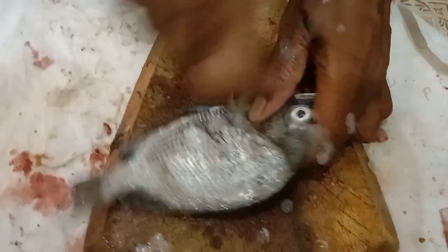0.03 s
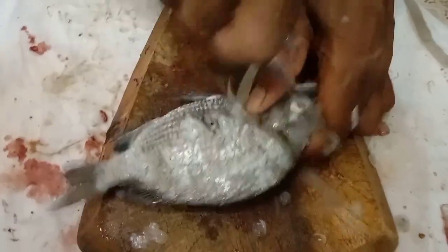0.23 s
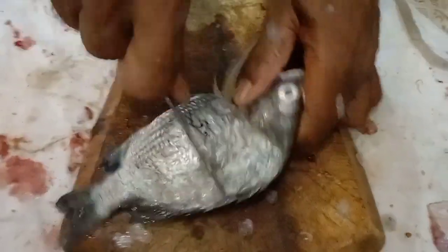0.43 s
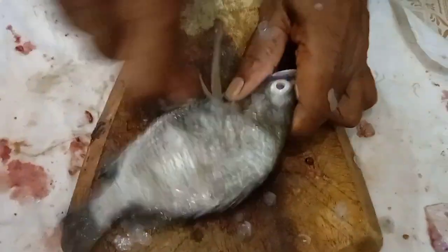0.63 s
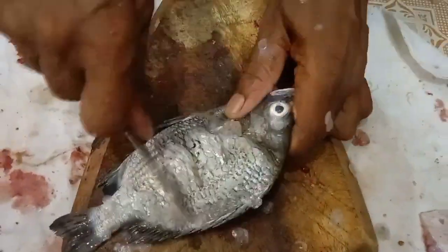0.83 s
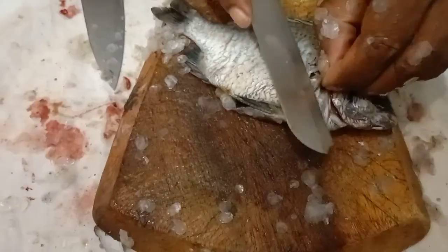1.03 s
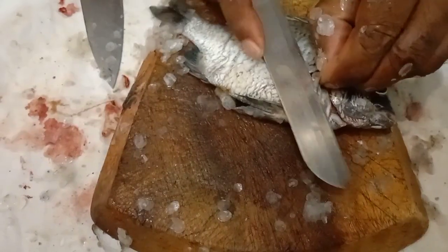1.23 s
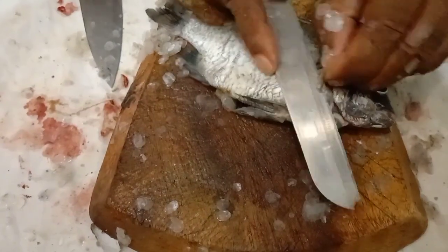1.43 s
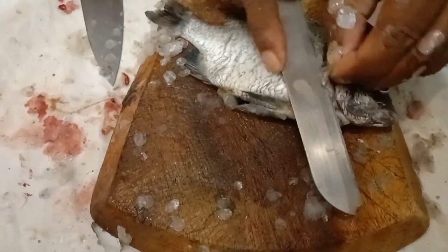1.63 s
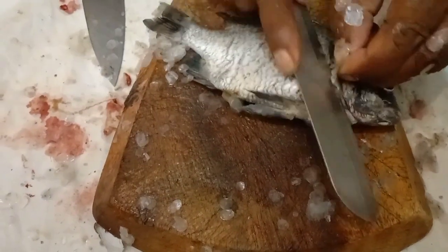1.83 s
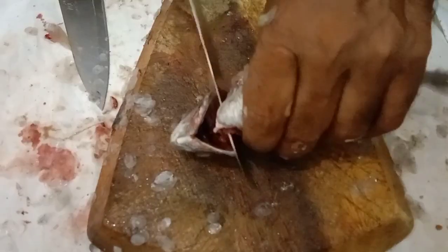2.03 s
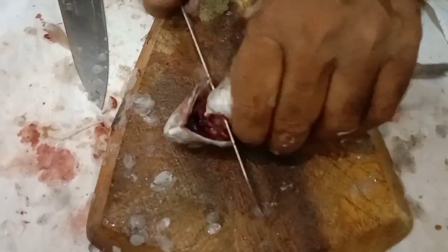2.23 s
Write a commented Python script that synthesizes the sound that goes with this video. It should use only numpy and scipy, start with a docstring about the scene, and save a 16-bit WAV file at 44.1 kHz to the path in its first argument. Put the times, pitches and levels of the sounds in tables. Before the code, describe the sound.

A knife scrapes scales off a fish close by for the first second, in short runs of tiny clicks with dull bumps on a wooden board. Fin spines snap with a crack and crunch at about 0.2, 0.45 and 0.7 seconds. From 1.2 to 2.2 seconds the knife saws in quick, quieter strokes, rasping twice on bone near 2 seconds. A faint rush like running water continues behind.

```python
"""Scaling and sawing a fish

Close by, a knife scrapes the scales off a fish in runs of tiny clicks. Fin spines snap with a crack
and a crunch, and the fish bumps dully on a wooden board. Then the knife saws in quick strokes and
rasps twice on bone. A steady rush, like running water, lies behind it all."""
import sys
import numpy as np
from scipy import signal
from scipy.fft import rfft, irfft
from scipy.io import wavfile
from scipy.ndimage import uniform_filter1d

SR = 44100
rng = np.random.default_rng(int(sys.argv[2]) if len(sys.argv) > 2 else 0)


def store_pcm(level_fs):
    """Save levels as 16-bit WAV."""
    pcm = np.round(np.clip(level_fs, -1, 1) * 32767).astype(np.int16)
    wavfile.write(sys.argv[1], SR, np.atleast_2d(pcm).T)


N = 101429

# A colour says how strong a sound is from low to high. Each row: frequency in Hz, relative level in dB.
EARLY_RUSH_COLOUR = [(300, -31.5), (740, 5), (1000, 2.5), (1130, -7), (1330, 10), (1700, 0), (2600, 0),
                     (3100, -21), (4700, -28.5), (6200, -6.5), (9000, -19.5)]
LATE_RUSH_COLOUR = [(300, -11.5), (620, -22), (800, -2), (1130, -6), (1400, 3), (2000, -3), (2800, 1),
                    (3450, -4), (4050, -28), (5000, -29), (6700, -15.5), (11500, -41)]
HOLLOW_COLOUR = [(590, -33), (850, 11.5), (1220, -27.5)]
BUMP_COLOUR = [(22, -74), (70, -14), (125, 3.5), (165, 3.5), (260, -12.5), (350, -4.5), (430, -21),
               (650, -10), (1000, -37)]
RASP_COLOUR = [(4300, -20.5), (4950, 2), (5600, 1.5), (7500, 0), (9300, -25)]
FIZZ_COLOUR = [(6000, -21.5), (9000, -9.5), (10400, -2), (12500, -6), (14800, 0)]
BONE_COLOUR = [(1600, -17), (3150, 3.5), (3700, -2.5), (4200, -27), (4900, -8), (6500, 3.5), (8800, -21),
               (10600, -9)]
CRUNCH_COLOUR = [(900, -27), (1900, -2), (3600, 2.5), (4800, -10), (6800, -3), (9800, -13), (12500, -2)]
SCRAPE_COLOUR = [(800, -14.5), (2900, -13), (4400, -13.5), (5600, 0.5), (7000, -1), (8600, -10.5),
                 (12200, -3), (15500, -8)]
# When the hollow tone swells, the fish bumps, the blade sings and single scales flick off.
# Each row: time in seconds, level in dB.
HOLLOW_SWELLS = [(.16, -48.5), (.395, -40.5), (.68, -45), (.86, -39.5), (1.27, -41.5), (1.5, -47),
                 (1.635, -42.5), (1.88, -45.5), (2.225, -41.5)]
FISH_BUMPS = [(.32, -44.5), (.38, -45), (.645, -49), (.705, -47), (.81, -49), (.865, -42.5), (.955, -36.5),
              (1.16, -56.5), (1.87, -58.5)]
BLADE_SINGS = [(.35, -37.5), (1.495, -41.5)]
SCALE_FLICKS = [(.2465, -16.5), (.2642, -18), (.2679, -12.5), (0.7236, -15), (.7343, -18.5), (0.7435, -17),
                (.9533, -22), (0.961, -16)]
# Brief dips in the quieter sounds. Each row: start in seconds, change of level in dB.
LEVEL_DIPS = [(0.198, -6), (0.986, -14), (1.029, -25.5), (1.972, -21), (2.015, -23.5)]
# Strokes through flesh. Each row: start and length in seconds, then rasp and fizz levels in dB.
SAW_STROKES = [(1.215, 0.16, -55, -49.5), (1.36, 0.08, -47, -44), (1.452, 0.1, -44, -38.5),
               (1.567, 0.084, -43.5, -36.5), (1.659, 0.1, -46.5, -43), (1.769, 0.091, -48, -44),
               (1.867, 0.098, -46, -45.5), (2.122, 0.1, -52, -46)]
# Strokes on bone. Each row: start and length in seconds, level in dB.
BONE_STROKES = [(1.972, 0.044, -30.5), (2.02, 0.049, -34)]
# Fin spines breaking. Each row: time in seconds, then crack, click and knock levels in dB.
SPINE_SNAPS = [(0.2161, -8, -4, -12), (0.4414, -9.5, -18, -28), (0.451, -0.5, -17.5, -22.5),
               (0.4595, -12, -8.5, -16.5), (0.4711, -8.5, -28, -29), (0.4814, -2, -31, -18.5),
               (0.6976, -21, -17.5, -23)]
# The tones in a snap's lower knock and higher click.
# Each row: pitch in Hz, level in dB, seconds to fade by 60 dB.
KNOCK_TONES = [(1326, -18, 0.029), (1886, -5, 0.025), (2498, -2.5, 0.011), (3493, 0.5, 0.013),
               (4350, -1, 0.011)]
CLICK_TONES = [(6020, -5, 0.011), (7200, -2, 0.0017)]
# Strokes over the scales. Each row: peak time, rise time and fall time in seconds, level in dB.
SCRAPE_STROKES = [(.051, 0.011, 0.018, -56.5), (0.136, 0.021, 0.016, -35.5), (0.269, 0.0067, 0.016, -30.5),
                  (0.345, 0.0044, 0.03, -26), (0.74, 0.016, 0.011, -29), (0.852, 0.019, 0.033, -33),
                  (0.874, 0.011, 0.0044, -30.5), (0.95, 0.0075, 0.014, -30), (.979, 0.0039, 0.0056, -31)]

T = np.arange(N) / SR
FADE_IN_S, SCALING_END_S = 0.28, 0.988


def amp(db):
    """Turns decibels into a number to multiply a sound by."""
    return 10 ** (np.asarray(db) / 20)


def unit(x):
    """Scales a signal so its average strength (rms) is one."""
    return x / np.sqrt(np.mean(x ** 2) + 1e-20)


def add(mix, s, sound):
    """Mixes a sound in, starting at s seconds."""
    part = mix[round(s * SR):][:len(sound)]
    part += sound[:len(part)]


def colour(x, points):
    """Gives a sound a colour and a strength of one; the filter rings only after a click, not before."""
    hz, db = np.transpose(points)
    log_hz = np.log(abs(np.fft.fftfreq(4096, 1 / SR)) + 1)
    log_gain = np.interp(log_hz, np.log(hz), db) * np.log(10) / 20
    taps = np.fft.ifft(np.exp(np.conj(signal.hilbert(log_gain)))).real[:2048]
    return unit(signal.oaconvolve(x, taps)[:N])


def noise(points):
    """Smooth noise of a given colour."""
    return colour(rng.standard_normal(N), points)


def wobble(hz):
    """A random wander, up to about hz times a second."""
    spectrum = rfft(rng.standard_normal(N))
    return unit(irfft(spectrum / (1 + (np.fft.rfftfreq(N, 1 / SR) / hz) ** 4), N))


def patchy(x, depth_db=3.5, size=1024):
    """Lets bands of pitch swell and sink at random; a smaller size gives wider, quicker patches."""
    frames = dict(nperseg=size, noverlap=size - size // 4)
    bands = signal.stft(x, **frames)[2]
    patches = uniform_filter1d(rng.standard_normal(bands.shape), size=4, axis=0)
    patches = uniform_filter1d(patches, size=9, axis=1)
    return unit(signal.istft(bands * amp(depth_db * unit(patches)), **frames)[1][:N])


def swells(rows, width_s):
    """A soft rise and fall in level around each row's time."""
    return sum(amp(db) * np.exp(-((T - s) / width_s) ** 2) for s, db in rows)


def bursts(rows, decay_s):
    """A level that jumps up at each row's time and dies away."""
    return sum(amp(db) * (T >= s) * np.exp(-abs(T - s) / decay_s) for s, db, *_ in rows)


def grains(per_s, spread_db, smooth):
    """Tiny slips of the blade, of uneven size, over smooth rubbing."""
    size = amp(spread_db * np.minimum(rng.exponential(1, N), 3))
    slips = size * rng.choice([-1., 1.], N) * (rng.random(N) < per_s / SR)
    return unit(unit(slips) + smooth * rng.standard_normal(N))


def stroke(start, length, fullness):
    """Blade speed over one stroke: quickly up from rest and more slowly back."""
    progress = np.clip((T - start) / length, 0, 1)
    return np.maximum(np.sin(np.pi * progress ** 0.63), 0) ** fullness * (progress < 1)


def ring(tones, t):
    """Fading tones, a little off pitch each time because every snap loads the blade differently."""
    detunes = 1 + 0.008 * rng.standard_normal(len(tones))
    return sum((-1) ** k * amp(db - 60 * t / fade_s) * np.sin(2 * np.pi * hz * detune * t)
               for k, ((hz, db, fade_s), detune) in enumerate(zip(tones, detunes)))


def room(x, fade_s=0.2, echo_db=-13):
    """Adds the short, faint echo of a small hard room."""
    t = np.arange(SR // 2) / SR
    tail = rng.standard_normal(len(t)) * amp(-60 * t / fade_s) * (1 - np.exp(-t / 0.071))
    return x + amp(echo_db) * signal.fftconvolve(x, tail / np.linalg.norm(tail))[:N]


def rush(rise_db_per_s=125, sway_db=1.0):
    """A steady rush fades in and turns brighter when scaling ends; a hollow tone comes and goes."""
    early = amp(-39.5 + rise_db_per_s * np.minimum(T - FADE_IN_S, 0)) * patchy(noise(EARLY_RUSH_COLOUR))
    late = amp(-39) * patchy(noise(LATE_RUSH_COLOUR))
    sway = amp(sway_db * wobble(hz=24.7))
    hollow = swells(HOLLOW_SWELLS, width_s=0.038) * noise(HOLLOW_COLOUR)
    return np.where(T < SCALING_END_S, early, late) * sway + hollow


def bumping():
    """Dull pushes of the fish on the board, over a low rumble of handling."""
    rumble = amp(-60.5) * np.minimum(T / FADE_IN_S, 1) ** 2
    return (swells(FISH_BUMPS, width_s=0.033) + rumble) * noise(BUMP_COLOUR)


def plop(at_s=0.077, hz=577, db=-42):
    """A small bubble in the wet flesh."""
    return swells([(at_s, db)], width_s=0.0017) * np.sin(2 * np.pi * hz * T)


def singing(hz=5400, sharpness=11):
    """In the hardest strokes, rubbing makes the blade ring around one pitch."""
    ringing = signal.lfilter(*signal.iirpeak(hz, sharpness, SR), rng.standard_normal(N))
    return swells(BLADE_SINGS, width_s=0.025) * unit(ringing)


def sawing():
    """The blade catches and slips to and fro through skin and flesh, and twice, harder, on bone."""
    rasp = sum(amp(db) * stroke(s, length, fullness=1.22) for s, length, db, _ in SAW_STROKES)
    fizz = sum(amp(db) * stroke(s, length, fullness=1.22) for s, length, _, db in SAW_STROKES)
    bone = sum(amp(db) * stroke(s, length, fullness=0.83) for s, length, db in BONE_STROKES)
    slips = grains(per_s=5000, spread_db=2.0, smooth=0.74)
    return (rasp * patchy(colour(slips, RASP_COLOUR))
            + fizz * patchy(colour(slips, FIZZ_COLOUR), size=512)
            + bone * colour(slips, BONE_COLOUR))


def flicking(low_hz=6400, high_hz=12000, decay_s=0.00063):
    """Now and then one scale flicks off with a sharp tick, pitched by its size."""
    t, out = T[T < 10 * decay_s], np.zeros(N)
    for s, db in SCALE_FLICKS:
        pitch = 1 + 0.07 * rng.standard_normal()
        tick = np.sin(2 * np.pi * low_hz * pitch * t) - np.sin(2 * np.pi * high_hz * pitch * t)
        add(out, s, amp(db) * np.exp(-t / decay_s) * tick)
    return out


def crunching(decay_s=0.057):
    """A gritty crunch dies away after each snap; the harder the snap, the more of it."""
    snaps = [(s, crack_db + knock_db) for s, crack_db, _, knock_db in SPINE_SNAPS]
    fade = np.sqrt(bursts(snaps, decay_s / 2))
    grit = colour(grains(per_s=4000, spread_db=3.8, smooth=0.5), CRUNCH_COLOUR)
    return amp(-22) * fade * grit


def cracking(hz=12060, rise_s=0.00031):
    """The first instant of each snap: a very short, high crack."""
    t, out = np.arange(SR // 200) / SR, np.zeros(N)
    crack = (t / rise_s * np.exp(1 - t / rise_s)) ** 2 * np.sin(2 * np.pi * hz * t)
    for s, db, *_ in SPINE_SNAPS:
        add(out, s, amp(db) * crack)
    return out


def snapping(scatter_s=0.0042, knock_rise_s=0.00049, bass_cut_hz=700):
    """Each spine splinters, clicks off the board and hands, and knocks the blade, which has no bass."""
    t = np.arange(SR // 25) / SR
    out = amp(-11.5) * bursts(SPINE_SNAPS, decay_s=0.0024) * noise(SCRAPE_COLOUR)  # splinters
    for s, _, click_db, knock_db in SPINE_SNAPS:
        scatter = rng.standard_normal(len(t)) * np.exp(-t / scatter_s)
        scatter *= amp(-9) / np.linalg.norm(scatter)
        scatter[0] = 1  # the direct sound, ahead of its tiny echoes
        click = amp(click_db) * ring(CLICK_TONES, t)
        knock = amp(knock_db) * ring(KNOCK_TONES, t) * (1 - np.exp(-t / knock_rise_s))
        add(out, s, signal.fftconvolve(click + knock, scatter))
    return signal.lfilter(*signal.butter(2, bass_cut_hz, "high", fs=SR), out)


def scraping(clump_db=1.8):
    """The edge runs over rows of wet scales in clumps of small clicks, each with its own colour."""
    power = sum(amp(2 * db) * np.exp(-((T - s) / np.where(T < s, rise, fall)) ** 2)
                for s, rise, fall, db in SCRAPE_STROKES)
    slips = grains(per_s=4000, spread_db=3.8, smooth=0.45) * amp(clump_db * wobble(hz=260))
    return np.sqrt(power) * patchy(colour(slips, SCRAPE_COLOUR), size=128)


def scene(dip_hold_s=0.0046, dip_return_s=0.0054):
    """Scaling comes first, then sawing; all but the scaling dips briefly in level a few times."""
    scaling = room(scraping() + snapping() + flicking()) + cracking() + crunching() + plop()
    quieter = room(sawing()) + singing() + bumping() + rush()
    dip_db = sum(db * (T >= s) * np.exp(-np.maximum(T - s - dip_hold_s, 0) / dip_return_s)
                 for s, db in LEVEL_DIPS)
    return (scaling * (T < SCALING_END_S) + amp(dip_db) * quieter)[None]


def record(dry, silent_s=0.03, bass_cut_hz=56, treble_cut_hz=15600):
    """Keeps the first instant silent and trims the deepest bass and the highest treble."""
    thin = signal.lfilter(*signal.butter(2, bass_cut_hz, "high", fs=SR), dry * (T > silent_s))
    low_pass = signal.firwin(401, treble_cut_hz, window=("kaiser", 9), fs=SR)
    return signal.oaconvolve(thin, low_pass[None], "same")


dry = scene()
out = record(dry)
store_pcm(out)
```